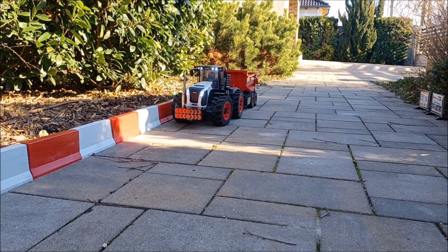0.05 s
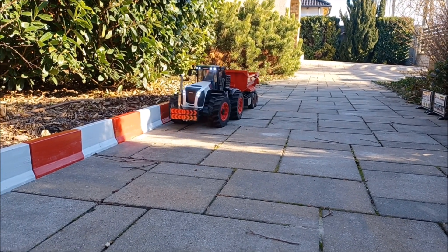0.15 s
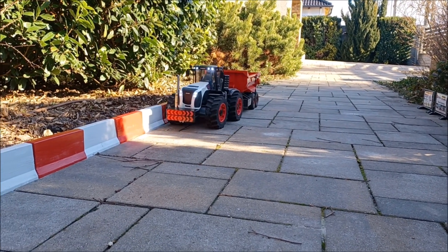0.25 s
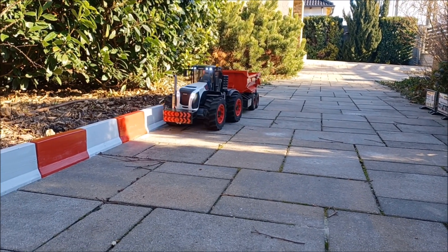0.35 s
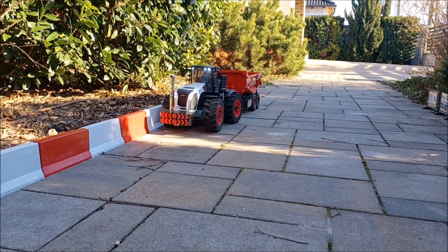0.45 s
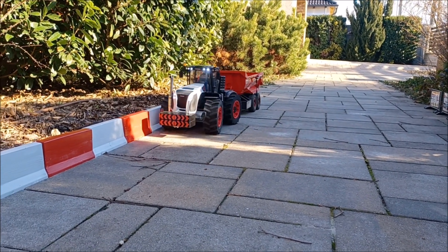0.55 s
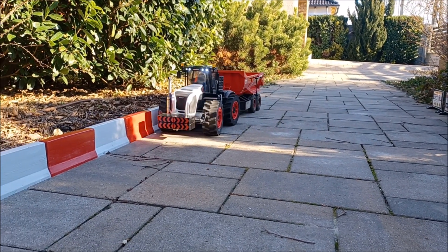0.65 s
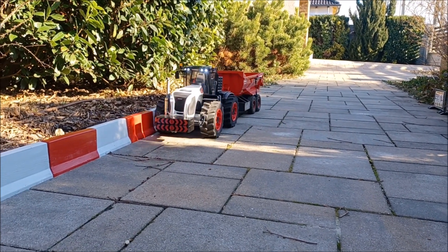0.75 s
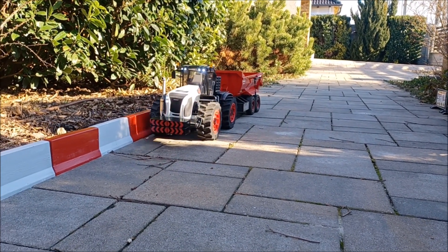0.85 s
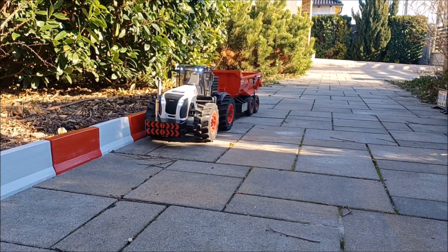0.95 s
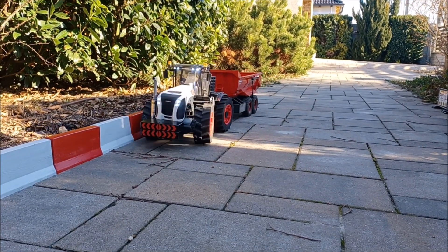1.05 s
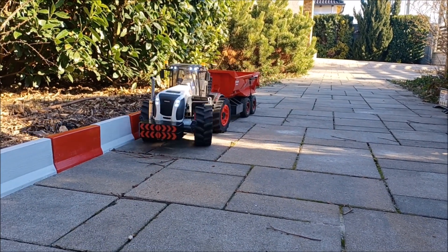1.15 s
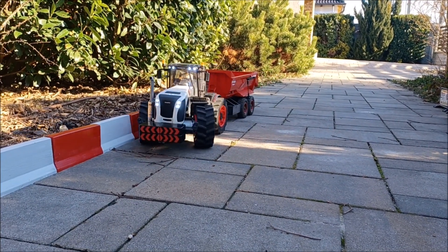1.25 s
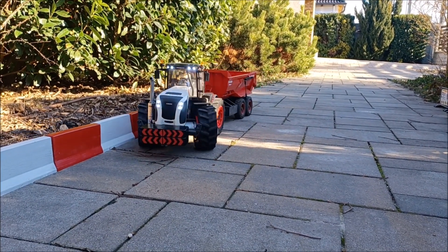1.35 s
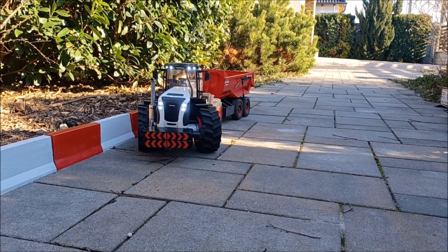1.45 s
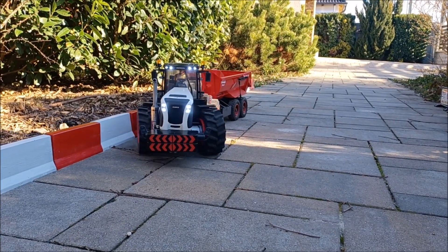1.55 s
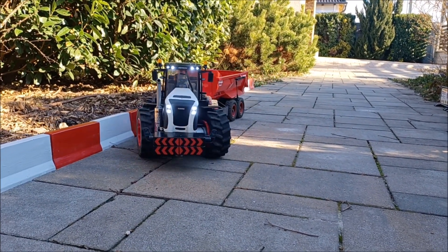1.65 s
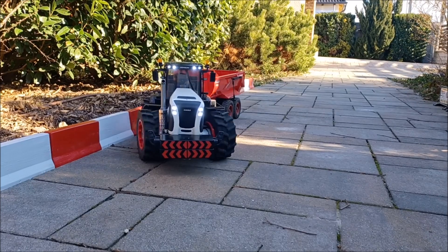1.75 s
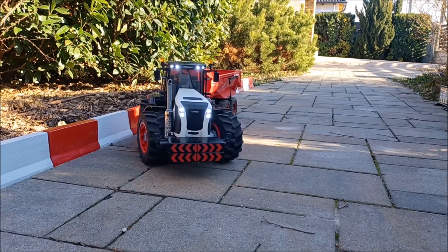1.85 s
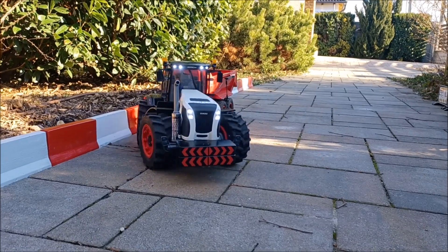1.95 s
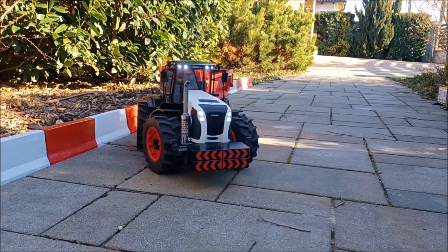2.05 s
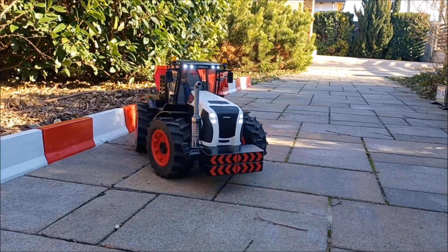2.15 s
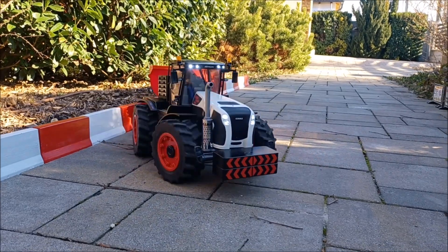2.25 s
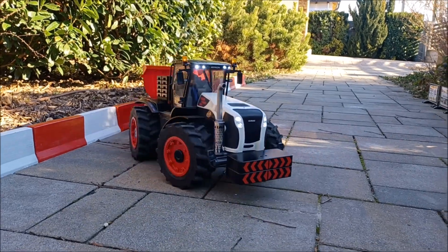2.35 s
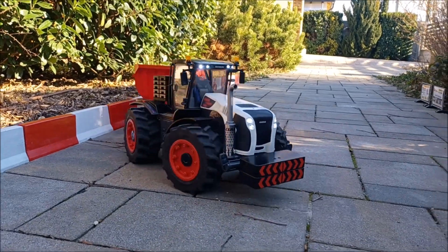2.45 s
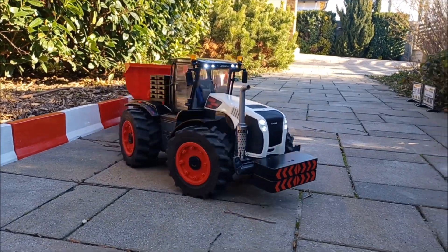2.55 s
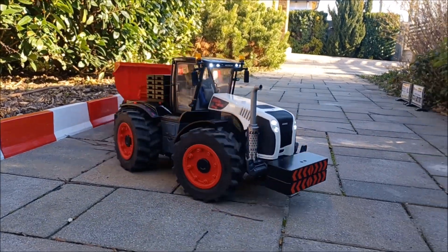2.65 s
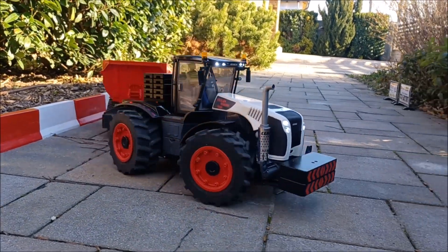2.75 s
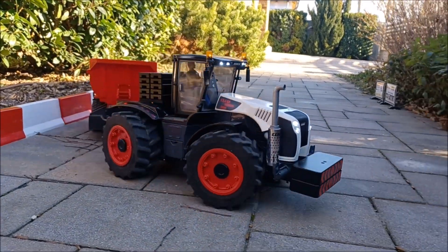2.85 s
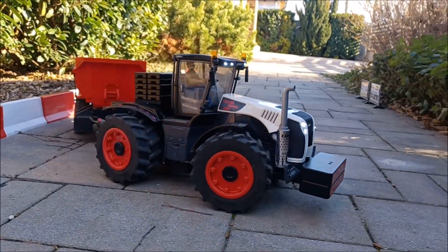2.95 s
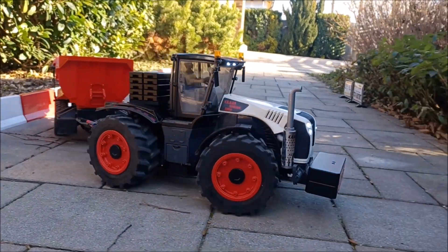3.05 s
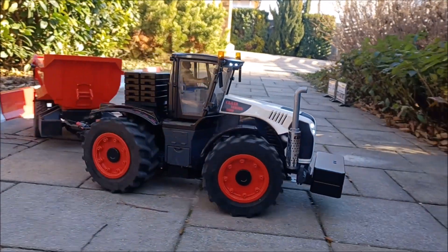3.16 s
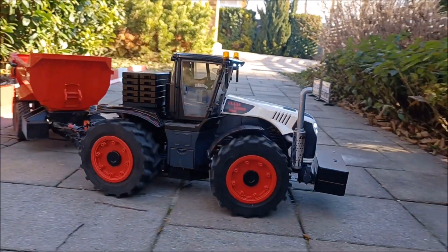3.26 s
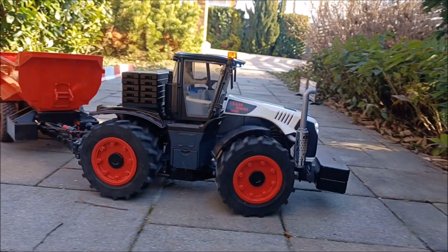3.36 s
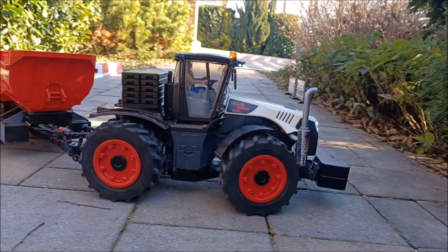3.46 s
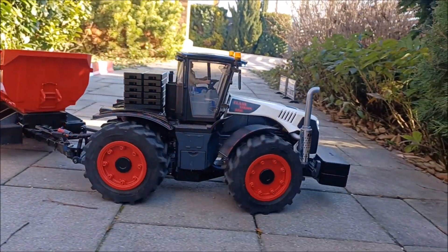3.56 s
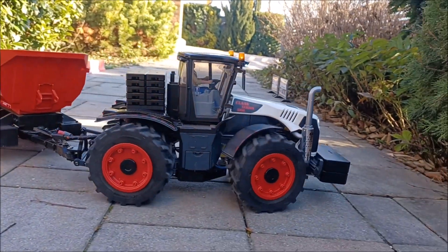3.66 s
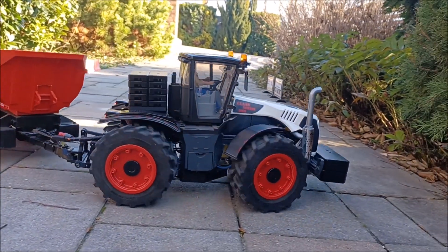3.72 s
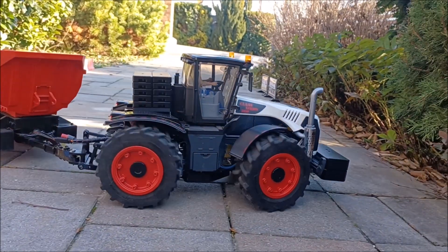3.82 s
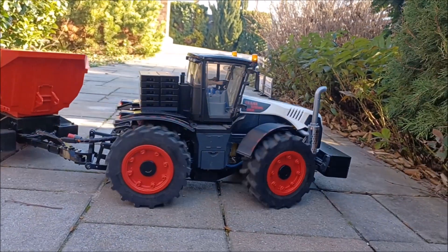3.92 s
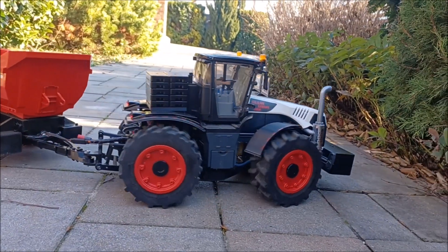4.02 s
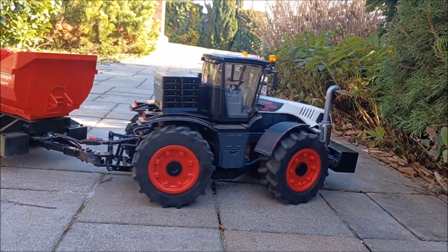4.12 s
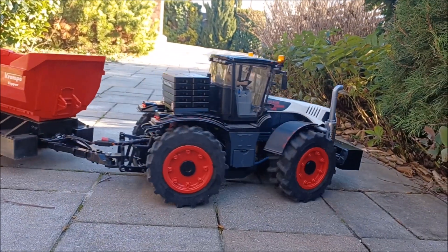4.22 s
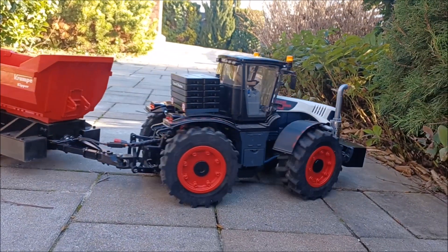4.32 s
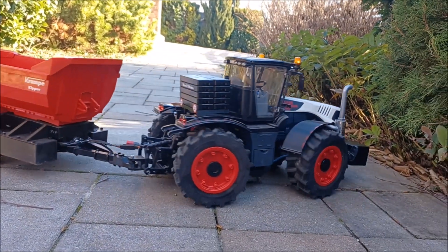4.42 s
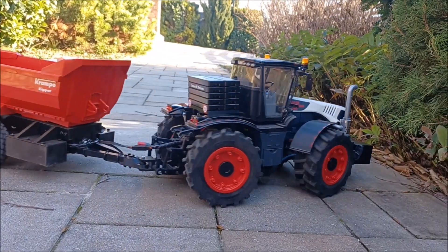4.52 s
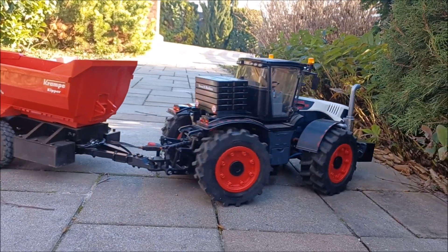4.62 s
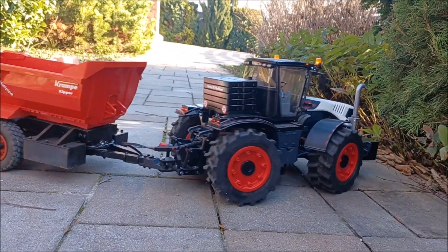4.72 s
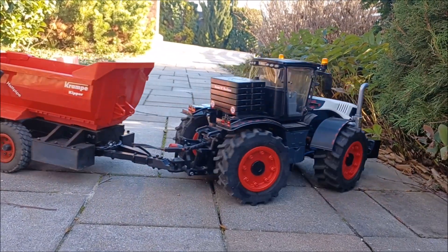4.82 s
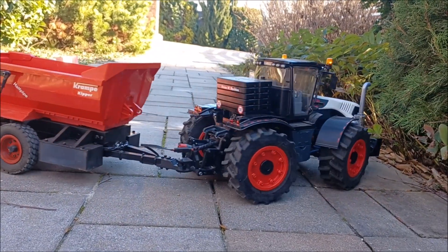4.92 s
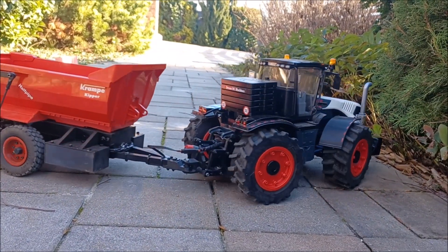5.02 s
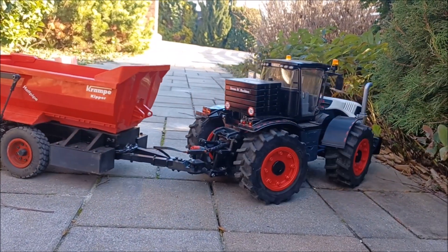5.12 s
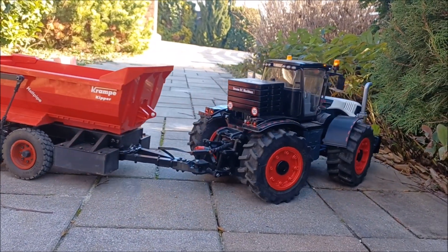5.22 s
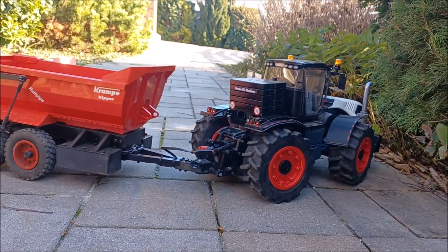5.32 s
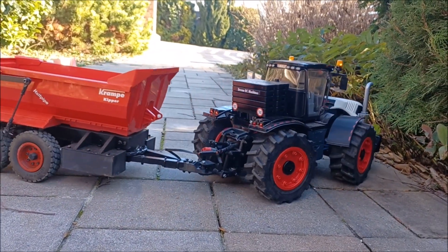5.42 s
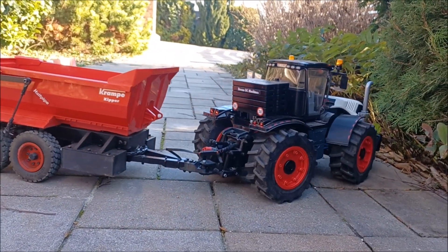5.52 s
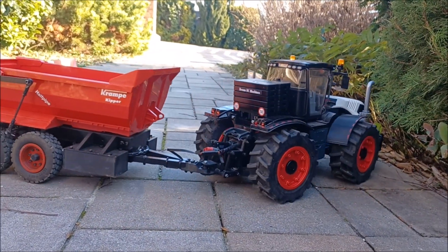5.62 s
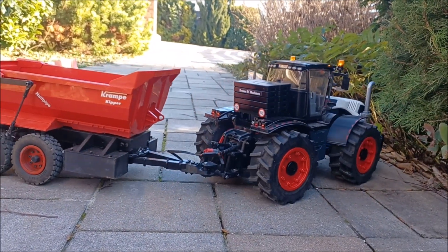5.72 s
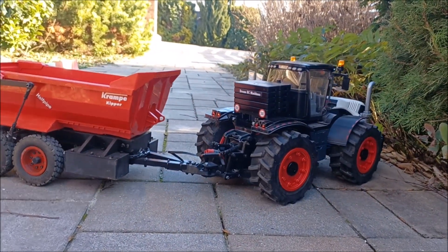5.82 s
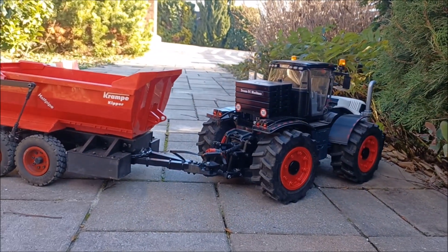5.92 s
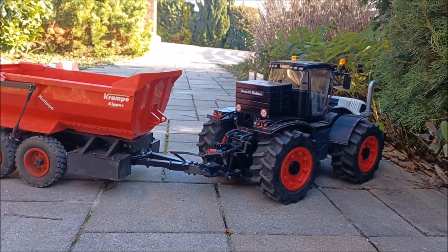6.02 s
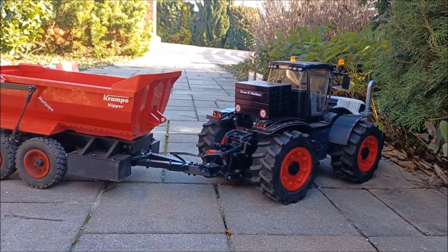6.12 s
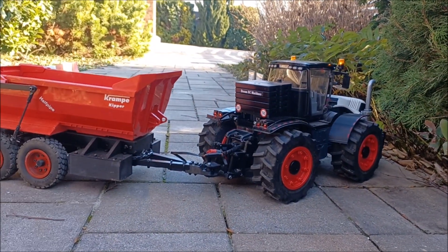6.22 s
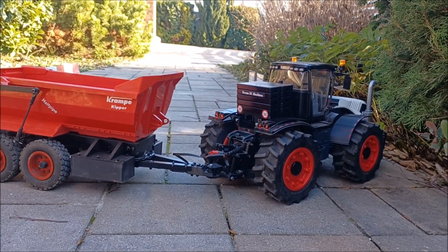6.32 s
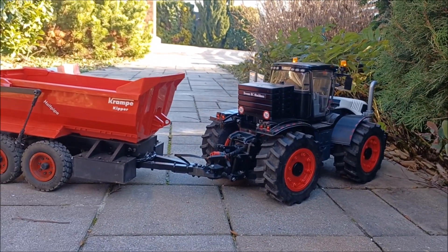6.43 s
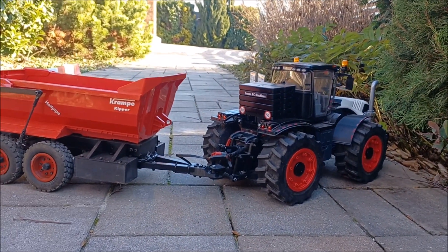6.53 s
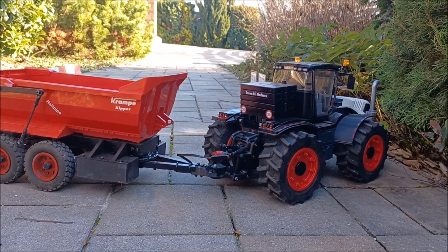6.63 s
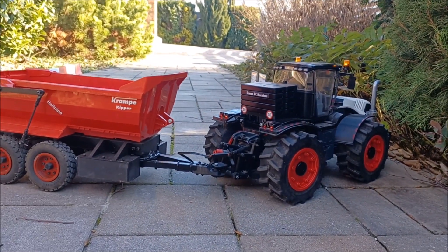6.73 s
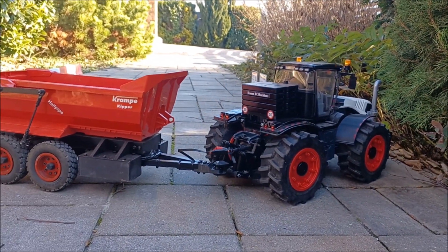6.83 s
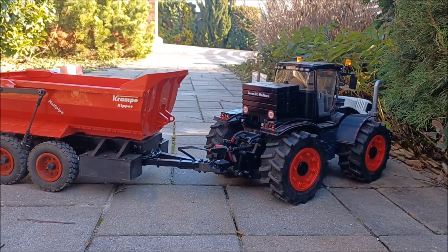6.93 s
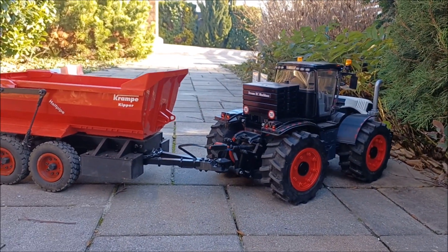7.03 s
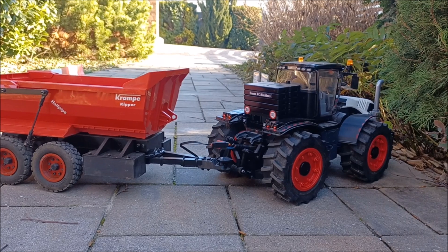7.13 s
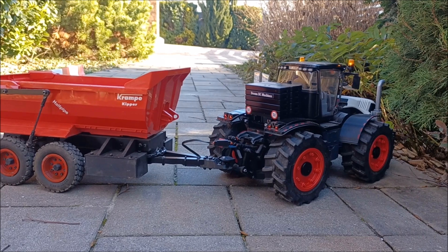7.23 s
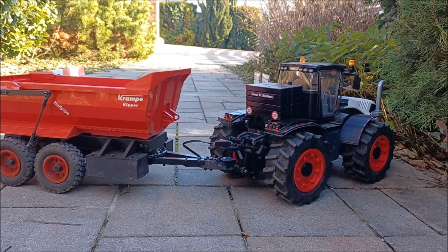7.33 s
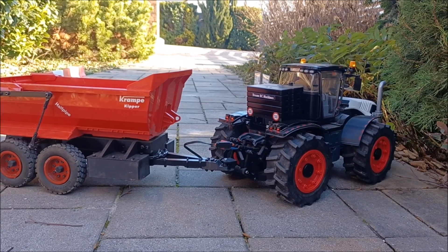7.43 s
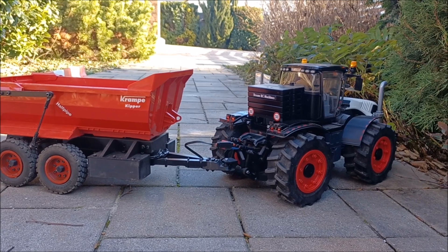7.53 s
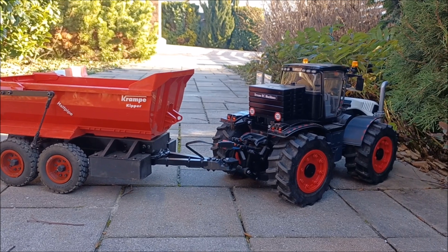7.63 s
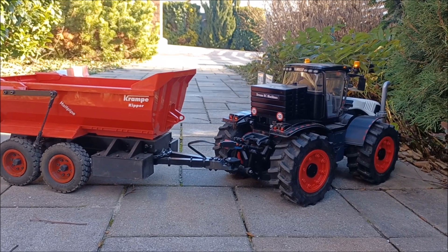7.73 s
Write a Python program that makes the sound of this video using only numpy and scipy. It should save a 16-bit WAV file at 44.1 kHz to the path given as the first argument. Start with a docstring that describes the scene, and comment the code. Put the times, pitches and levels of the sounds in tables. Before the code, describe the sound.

A model tractor whines and grinds over paving, slows to a stop with dull knocks, then its steering servo rasps.

```python
"""A rolling grind and a few dull knocks come first: a model tractor tows a trailer over paving slabs.
Its gears whine at the tooth-meshing rate and chatter through a resonant housing as it passes close by.
It slows, the pitch falls, grit ticks under the tyres, and the hitch clacks at the halt.
Then the steering servo rasps in short bursts. The garden around it is quiet."""
import sys
import numpy as np
from scipy import signal
from scipy.fft import rfft, irfft, next_fast_len
from scipy.io import wavfile
from scipy.ndimage import map_coordinates

SR = 44100
rng = np.random.default_rng(int(sys.argv[2]) if len(sys.argv) > 2 else 0)


def waveform_to_disk(signal):
    """Save audio, clipped to [-1, 1], as 16-bit WAV at the path in sys.argv[1]."""
    frames = np.transpose(np.atleast_2d(signal))
    scaled = np.clip(frames, -1, 1) * 32767
    samples = np.round(scaled).astype(np.int16)
    wavfile.write(sys.argv[1], SR, samples)


N = 342951
T = np.arange(N) / SR
CRUISE_HZ = 3050  # tooth-meshing rate at cruising speed


def amp(db):
    """Decibels to amplitude ratio."""
    return 10 ** (np.asarray(db) / 20)


def unit(x):
    """Normalise to rms 1."""
    return x / np.sqrt(np.mean(x ** 2) + 1e-20)


def along(points, hz):
    """Interpolate (Hz, value) points on a logarithmic frequency axis."""
    freqs, values = np.transpose(points)
    return np.interp(np.log(hz + 1), np.log(freqs + 1), values)


def levels(rows, fade=.017):
    """An envelope through (seconds, dB) points, decaying exponentially beyond both ends."""
    times, db = np.transpose(rows)
    outside = np.abs(T - np.clip(T, times[0], times[-1]))
    return amp(np.interp(T, times, db)) * np.exp(-outside / fade)


def held(start, end, first_db, last_db, fade=.017):
    """An envelope with exponential flanks and a sloping sustain."""
    return levels([(start, first_db), (end, last_db)], fade)


def white():
    """Two uncorrelated white noises."""
    return rng.standard_normal((2, N))


def wobble(rate):
    """Smooth random modulation, with rate knots a second."""
    return map_coordinates(rng.standard_normal(int(N * rate / SR) + 4), [T * rate])


def filtered(x, response):
    """Linear filtering: the spectrum of x times a frequency response."""
    size = next_fast_len(N + SR // 2)
    return irfft(rfft(x, size) * response(np.fft.rfftfreq(size, 1 / SR)), size)[..., :N]


def rush(spectrum, force=None):
    """Source and filter: a force, white unless given, is coloured by the body it shakes; rms 1."""
    # Each row: frequency in Hz, left-right correlation.
    coherence = [(150, 0.58), (900, 0.69), (2400, 0.3)]

    def response(hz):
        angle = np.arccos(np.clip(along(coherence, hz), -1, 1)) / 2
        return amp(along(spectrum, hz)) * [np.cos(angle), np.sin(angle)]
    mid, side = filtered(white() if force is None else force, response)
    return unit(np.array([mid + side, mid - side]))


def ring(hz, half_width_hz):
    """A randomly driven resonance passes a narrow band of noise; rms 1."""
    return unit(filtered(white(), lambda f: 1 / (1 + 1j * (f - hz) / half_width_hz) ** 2))


def modes(rows):
    """Modal superposition: independently driven resonances add."""
    return sum(amp(db) * ring(hz, half_width) for hz, half_width, db in rows)


def snaps(rows, spectrum, t60, rise):
    """Damped impacts: each is a burst of coloured noise that falls 60 dB in t60 seconds."""
    out, noise = np.zeros((2, N)), rush(spectrum)
    for start, db in rows:
        span = slice(int(start * SR), int(start * SR) + SR // 10)
        t = T[span] - T[span][0]
        hit = noise[:, span] * amp(-60 * t / t60) * (1 - np.exp(-t / rise))
        out[:, span] += amp(db) * hit / np.abs(hit).max()
    return out


def garden():
    """Ambient noise: quiet broadband air and a narrowband electronic whistle."""
    # Each row: frequency in Hz, relative level in dB.
    air = [(24, -56), (40, -32.5), (113, -12.5), (257, -25), (480, -31), (728, -28), (1200, -30.5),
           (2200, -42), (9840, -56.5), (15000, -38)]
    return amp(-69.5) * rush(air) + amp(-77) * ring(15672, half_width_hz=22)


def idle():
    """Amplitude-shaped noise: the resting drive sizzles and fades, with two soft scuffs."""
    # Each row: start and end in seconds, level in dB.
    rubs = [(6.43, 6.472, -73.5), (7.394, 7.437, -74)]
    # Each row: frequency in Hz, relative level in dB.
    spectrum = [(1700, -7), (2900, -8), (5500, -12.5), (8500, -23.5)]
    sizzle = levels([(5.3, -69), (6.55, -73), (7.3, -78)], fade=.08)
    scuffs = sum(held(start, end, db, db, fade=.015) for start, end, db in rubs)
    return (sizzle + scuffs) * rush(spectrum)


def controller():
    """Switching in the speed controller gives a narrowband whistle at a crawl."""
    return held(5.0, 5.28, first_db=-73, last_db=-77) * ring(8040, half_width_hz=25)


def grit():
    """Brief contacts have broad spectra: grit ticks brightly under the tyres."""
    # Each row: start in seconds, relative peak in dB.
    ticks = [(3.8096, -35.5), (4.1901, -32), (4.578, -31.5), (4.6638, -28.5), (4.7451, -35.5),
             (4.9202, -30.5), (5.351, -54), (6.5174, -53.5)]
    # Each row: frequency in Hz, relative level in dB.
    spectrum = [(1500, -34), (4000, -1), (6000, -0.5), (8500, -21), (11000, -5), (15500, -8.5)]
    return amp(5.5) * snaps(ticks, spectrum, t60=.025, rise=.0003)


def linkage():
    """Impulsive excitation: the steering linkage clicks as it snaps over."""
    # Each row: start in seconds, peak in dB.
    clicks = [(.82, -42.5), (.902, -42), (5.351, -41.5), (5.857, -37)]
    # Each row: frequency in Hz, relative level in dB.
    spectrum = [(2200, -18), (4100, 4), (7500, -24.5)]
    return snaps(clicks, spectrum, t60=.03, rise=.0004)


def hitch():
    """Impact across a clearance: the hitch clacks as it takes up its play."""
    # Each row: start in seconds, relative peak in dB.
    clacks = [(5.428, -39), (5.777, -44.5), (5.811, -33.5), (5.84, -41.5), (5.882, -37), (5.888, -27.5)]
    # Each row: frequency in Hz, relative level in dB.
    spectrum = [(150, -3.5), (350, -4.5), (780, -9.5), (1260, -6), (2400, -11), (3040, -10.5),
                (6300, -24.5), (8000, -40)]
    return amp(2) * snaps(clacks, spectrum, t60=.026, rise=.0013)


def knocks(touch_gap_s=.017, lead_in_db=12.5):
    """Damped oscillation: each soft blow swings for about ten cycles over a dull thud."""
    # Each row: time in seconds, relative peak in dB, pitch in Hz, lead-in in seconds.
    blows = [(.173, -49, 111, 0.026), (0.68, -43, 110, 0.023), (.833, -42, 290, 0.018),
             (.921, -39.5, 308, 0.024), (1.14, -40, 494.6, 0.0072), (5.371, -46.5, 252, 0.019),
             (5.429, -40.5, 498, .005), (5.5, -33.5, 227, 0.015), (5.518, -33.5, 236, 0.0064),
             (5.529, -27, 251, .008), (5.786, -50, 223, 0.043), (5.888, -32, 290, 0.025),
             (5.93, -29.5, 124, 0.0074), (5.933, -25.5, 193, 0.031), (6.495, -49.5, 255, 0.038),
             (7.424, -57, 138, 0.018)]
    # Three lighter touches lead up to each blow.
    touches = [(time - ahead, db - lead_in_db * ahead / lead, hz)
               for time, db, hz, lead in blows for ahead in touch_gap_s * np.arange(4)]
    swings, envelope = np.zeros((2, N)), np.zeros(N)
    t = T[:SR // 5]
    for start, db, hz in touches:
        t60 = .025 + 8 / hz
        shape = (1 - np.exp(-(t / .004) ** 2)) * amp(-60 * t / t60)
        shape = amp(db) * shape / shape.max()
        stereo_phase = np.array([[-.88], [.88]]) * min(hz / 250, 1)
        span = slice(int(start * SR), int(start * SR) + len(t))
        swings[:, span] += shape * np.sin(2 * np.pi * hz * t + stereo_phase)
        envelope[span] += shape
    thud = rush([(50, -28), (95, -3), (250, 5), (520, -3), (900, -21), (4000, -65)])
    return amp(-1) * swings + amp(-10.5) * envelope * thud


def servo():
    """Modulated noise and resonances: the steering servo strains, rasps in bursts and squeaks."""
    # Each row: start and end in seconds, first and last relative level in dB.
    bursts = [(6.725, 6.914, -50.5, -49), (6.943, 7.001, -51, -54), (7.009, 7.101, -53, -55),
              (7.13, 7.179, -56, -63), (7.187, 7.218, -63.5, -59.5)]
    # The servo holds the wheels, later squeaks. Each row: time in seconds, level in dB.
    strain_levels = [(5.395, -52), (5.49, -55.5), (5.58, -47.5), (5.69, -46), (5.725, -51)]
    squeaks = [(7.097, -55), (7.165, -55)]
    # Each row: frequency in Hz, relative level in dB.
    rasp_spectrum = [(290, -64), (500, -41), (805, -10), (1680, -23), (2150, -1.5), (3730, -10), (4240, -1),
                     (5830, -5.5), (6360, -6), (8610, -20), (11700, -2.5), (15800, -11.5)]
    strain_spectrum = [(500, -48), (820, -29), (1050, -39), (1300, -24), (1800, -34), (3250, -0.5),
                       (4000, -18.5), (5400, -4), (8600, -18.5), (10100, -19.5), (15500, -20)]
    # Each row: frequency and half-width in Hz, relative level in dB.
    rasp_modes = [(1320, 70, -24.5), (2150, 350, -10), (2910, 110, -14), (4290, 61, -9.5),
                  (6400, 120, -11.5), (7990, 90, -24.5), (12000, 190, -11)]
    strain_modes = [(810, 32, -22), (1275, 60, -22.5), (2850, 59, -14.5), (5420, 140, -10),
                    (10000, 160, -8.5), (12170, 310, -12.5)]
    gate = sum(held(*burst, fade=.002) for burst in bursts)
    # The gears spin on briefly after each burst.
    run_on = np.max([(T > burst[0]) * held(*burst, fade=.03) for burst in bursts], axis=0)
    teeth = amp(1.6 * wobble(900))
    judder = amp(1.1 * wobble(300))
    rasp = unit(judder * (rush(rasp_spectrum, teeth * white()) + modes(rasp_modes)))
    squeak = sum(held(time, time, db, db, fade=.013) for time, db in squeaks) * ring(2696, 49)
    hiss = unit(rush(strain_spectrum, teeth * white()) + modes(strain_modes))
    strain = levels(strain_levels, fade=.016) * hiss
    return amp(4) * (gate + amp(-7.5) * run_on) * rasp + squeak + strain


def driven(mesh, db, growth, db_per_octave=0):
    """Power laws: a part's amplitude follows the drive's strength and the motor speed."""
    # The drive pulls, nears, moves off and stops. Each row: time in seconds, strength in dB.
    strength = [(0, -11), (.5, -11), (.72, -8), (.99, -12), (1.13, -5.5), (1.4, -4.5), (2.2, -2),
                (3.3, 1.5), (3.86, -0.5), (4.4, -2), (4.91, -4.5), (5.33, -12.5)]
    return amp(db + db_per_octave * np.log2(mesh / CRUISE_HZ)) * levels(strength, fade=.13) ** growth


def grind(cycles, memory, teeth=40, points_per_turn=1024):
    """Quasi-periodic forcing: roughness partly repeats each shaft turn, giving broadened lines."""
    turns = cycles / teeth
    fresh = rng.standard_normal((2, int(turns[-1]) + 2, points_per_turn))
    track = signal.lfilter([1], [1, -memory], fresh, axis=1).reshape(2, -1)
    force = np.array([np.interp(turns * points_per_turn, np.arange(len(row)), row) for row in track])
    return force * np.sqrt(np.gradient(turns))


def axles(mesh, cycles, rattle, quiet_below_hz=1160):
    """Rolling noise: roughness shakes the tyres and axles, which fall quiet at low mesh rates."""
    # Each row: frequency in Hz, relative level in dB.
    spectrum = [(35, -64.5), (60, -26), (118, -25.5), (260, -23.5), (371, -16), (490, -18), (598, -6),
                (1440, -1), (1630, -4), (2400, 1), (3120, -28), (5280, -120)]
    rolling = np.minimum(mesh / quiet_below_hz, 1) ** 2
    gain = rolling * driven(mesh, db=-45, growth=.8, db_per_octave=3.12)
    return gain * rush(spectrum, rattle * grind(cycles, memory=.43))


def housing(mesh, cycles, rattle):
    """Forced vibration: tooth roughness drives the resonant housing."""
    # Each row: frequency in Hz, relative level in dB.
    spectrum = [(900, -28.5), (1250, -12), (1600, -38), (2000, -16), (2400, -6), (2800, 2.5), (3100, 4),
                (3400, -6.5), (4400, -33)]
    return driven(mesh, db=-39, growth=1.21) * rush(spectrum, rattle * grind(cycles, memory=.65))


def chatter(mesh, rattle):
    """Sympathetic vibration: metal parts ring along with the chattering teeth."""
    # Each row: frequency in Hz, relative level in dB.
    spectrum = [(2120, -28.5), (3600, -11), (3780, -11.5), (4420, -1.5), (5150, -10.5), (5800, -7),
                (7070, -9), (8670, -18.5), (10400, -8), (15100, -15.5), (15800, -20.5)]
    # Each row: frequency and half-width in Hz, relative level in dB.
    chassis = [(5165, 320, -3.5), (6420, 460, -8.5), (10120, 190, -14)]
    vibration = unit(rush(spectrum, rattle * white()) + rattle * modes(chassis))
    return driven(mesh, db=-40.5, growth=1.21, db_per_octave=5.13) * vibration


def tone(mesh, cycles, flutter_db, smear_rad, apart_rad):
    """Backlash modulates a gear tone's level and phase; ground echoes shift its stereo phase."""
    slack = np.clip(np.log2(CRUISE_HZ / mesh) / .25, 0, 1)  # full a quarter octave below cruise
    phase = 2 * np.pi * cycles + smear_rad * wobble(45) + .42 * slack * wobble(170)
    flutter = amp(flutter_db * (wobble(50) + wobble(140)))
    stereo_phase = np.outer([1, -1], apart_rad * wobble(12))
    return unit(flutter * np.sin(phase + stereo_phase))


def gear_train(mesh, cycles):
    """Gears sound at set ratios of the mesh rate, each tone wavering as the load shifts."""
    # Each row: multiple of the mesh rate, relative level in dB, dB per octave of speed.
    gears = [(.164, -17.5, 8), (.2, -18, 8.5), (.24, -20, -4.5), (.35, -16.5, 1.5), (.5, -11.5, 6),
             (.575, -11, 6), (1.21, -32, -17), (1.5, -7, 3), (1.79, -20, -2), (2, -16, -3),
             (2.32, -11.5, 10), (2.44, -17, -3), (3, -21, -1)]
    # How the body radiates. Each row: frequency in Hz, gain in dB.
    radiation = [(320, -23), (385, -7.5), (450, -20), (600, -16), (950, -4.5), (1100, -6.5), (1380, -2),
                 (1750, -13), (2000, -3.5), (2400, 2), (2650, 10.5), (2850, 14), (3150, 7.5), (3330, 3.5),
                 (3700, -7.5), (4500, -8.5), (4900, -20), (7000, -9.5), (8800, -30.5), (10500, -6)]
    # The teeth sound while they carry load. Each row: time in seconds, gain in dB.
    load = [(1.0, -6), (1.26, 1.5), (4.97, 1.5), (5.12, -9)]
    out, octaves = 0, np.log2(mesh / CRUISE_HZ)
    for ratio, db, db_per_octave in gears:
        contact = unit(amp(1.5 * wobble(24)))
        line = tone(mesh, ratio * cycles, flutter_db=1.7, smear_rad=.3 + .1 * ratio ** 2, apart_rad=.8)
        out += amp(db + db_per_octave * octaves + along(radiation, ratio * mesh)) * contact * line
    bite = amp(np.interp(T, *np.transpose(load)))
    return driven(mesh, db=-36.5, growth=1.32, db_per_octave=3.8) * bite * out


def whine(mesh, cycles, runout_db=2.8, teeth=54):
    """Amplitude modulation of the mesh tone: an eccentric gear presses harder once a turn."""
    # The tone swells with the pull on the gear. Each row: time in seconds, level in dB.
    swell = [(1.24, -36.5), (1.6, -36.5), (1.75, -37), (1.85, -33), (1.91, -43), (1.97, -32.5),
             (2.07, -32.5), (2.27, -40.5), (2.34, -39.5), (2.45, -42), (2.65, -34), (2.74, -26.5),
             (2.82, -30.5), (2.87, -46), (2.98, -30), (3.09, -28), (3.14, -42), (3.23, -28.5),
             (3.28, -42.5), (3.36, -33.5), (3.41, -45.5), (3.53, -48.5)]
    runout = unit(amp(runout_db * np.sin(2 * np.pi * cycles / teeth + 2 * wobble(23))))
    line = tone(mesh, cycles, flutter_db=1.2, smear_rad=.22, apart_rad=.45)
    return levels(swell, fade=.013) * runout * line


def tractor(left_lead_s=.00007):
    """One motor paces the whole drive; a path difference brings its sound to the left side first."""
    # Cruise, two throttle steps down, coast. Each row: time in seconds, mesh rate in Hz.
    mesh_rates = [(1.23, 3160), (1.28, 3085), (1.65, 3015), (2.0, 3055), (2.2, 3025), (2.6, 3045),
                  (2.75, 2980), (2.85, 3035), (3.1, 3018), (3.19, 3070), (3.31, 2720), (3.38, 2410),
                  (3.49, 2100), (3.55, 1880), (3.73, 1575), (3.91, 1545), (4.05, 1585), (4.22, 1595),
                  (4.37, 1580), (4.45, 1400), (4.52, 1315), (4.56, 1225), (4.7, 1142), (4.84, 1166),
                  (4.92, 1120), (5.0, 1005), (5.4, 700)]
    speed = np.interp(T, *np.transpose(mesh_rates))
    waver = .0012 * np.minimum(CRUISE_HZ / speed, 2) ** 1.5  # a slower motor wavers more
    mesh = speed * (1 + waver * wobble(20))
    cycles = np.cumsum(mesh) / SR
    gears = gear_train(mesh, cycles)
    rattle = amp(.78 * wobble(700) + 1.22 * wobble(50))
    noise = axles(mesh, cycles, rattle) + housing(mesh, cycles, rattle) + chatter(mesh, rattle)
    drive = whine(mesh, cycles) + gears + noise
    return filtered(drive, lambda hz: np.exp(np.outer([1j, -1j], np.pi * hz * left_lead_s)))


def scene():
    """Superposition: the pressures of all sources add."""
    contacts = hitch() + grit() + linkage()
    return contacts + tractor() + knocks() + servo() + controller() + idle() + garden()


def record(dry, low_hz=66, top_hz=15870):
    """A band-limited microphone: each of its two ports has its own frequency response."""
    # Each row: frequency in Hz, left minus right level in dB.
    imbalance = [(150, -2), (1200, -2), (3800, -1), (4600, 11.5), (6200, 3), (8400, 19.5), (9800, 3),
                 (12300, -11), (14500, 0.5)]

    def ports(hz):
        pair = amp(np.outer([.5, -.5], along(imbalance, hz)))
        return pair / np.sqrt(np.mean(pair ** 2, axis=0))
    bass_cut = signal.sosfilt(signal.butter(2, low_hz, "highpass", fs=SR, output="sos"), dry)
    return filtered(filtered(bass_cut, ports), lambda hz: hz < top_hz)


dry = scene()
out = record(dry)
waveform_to_disk(out)
```